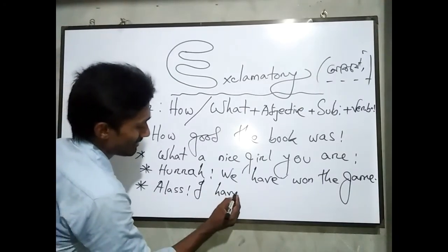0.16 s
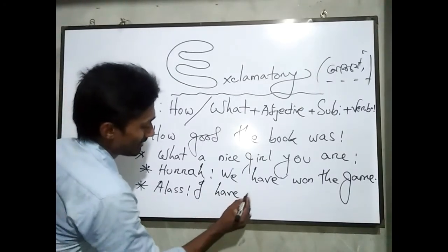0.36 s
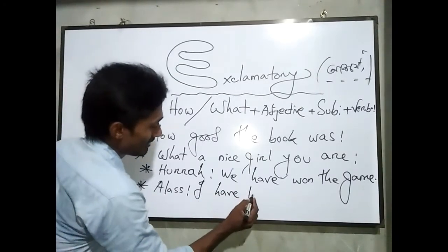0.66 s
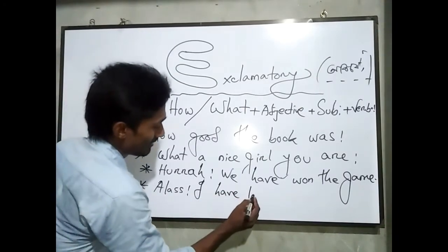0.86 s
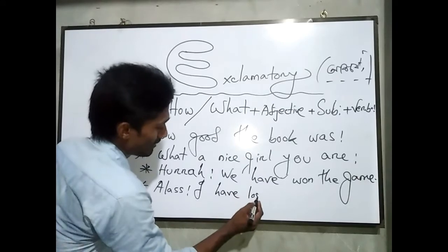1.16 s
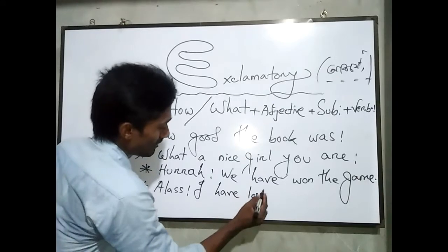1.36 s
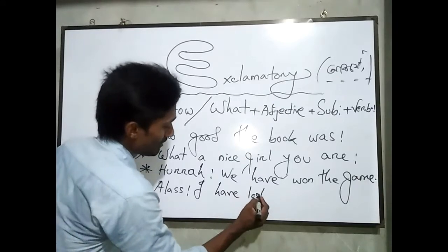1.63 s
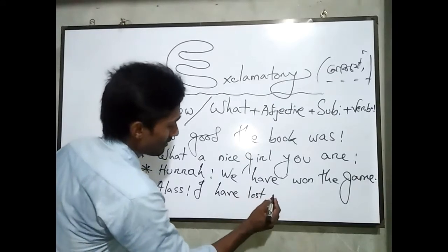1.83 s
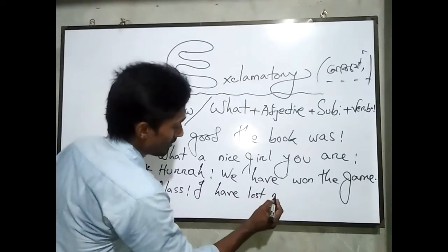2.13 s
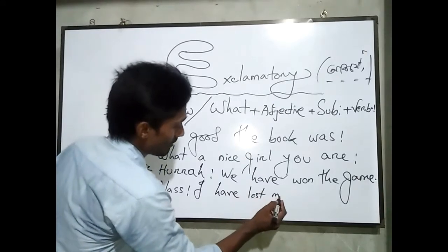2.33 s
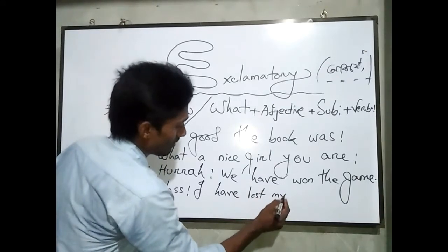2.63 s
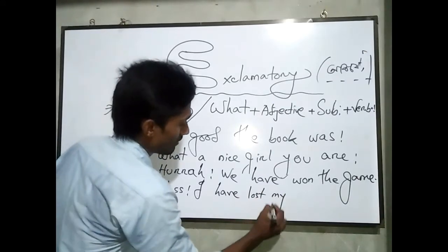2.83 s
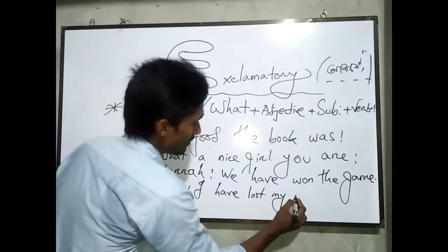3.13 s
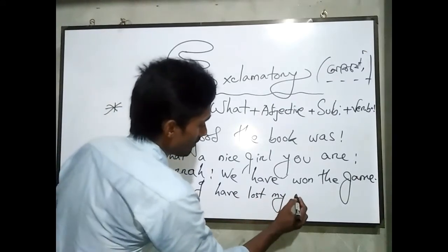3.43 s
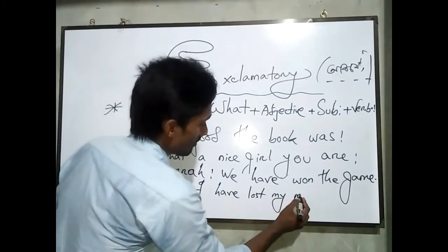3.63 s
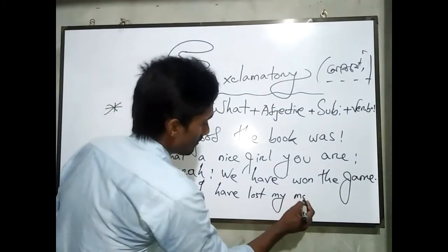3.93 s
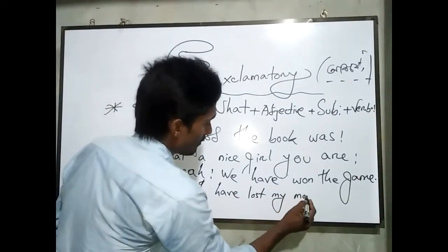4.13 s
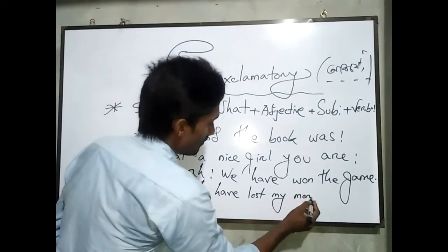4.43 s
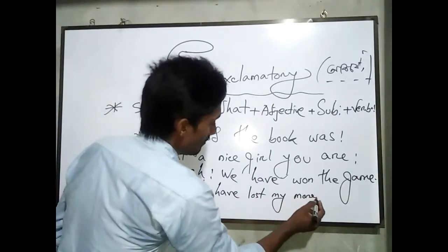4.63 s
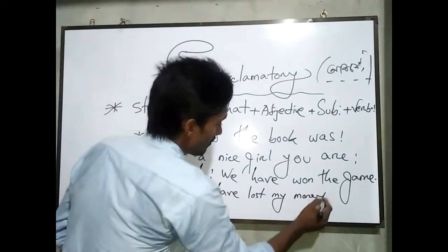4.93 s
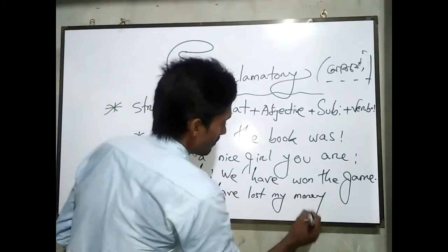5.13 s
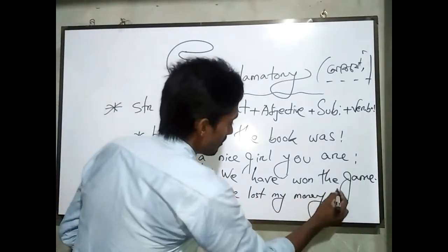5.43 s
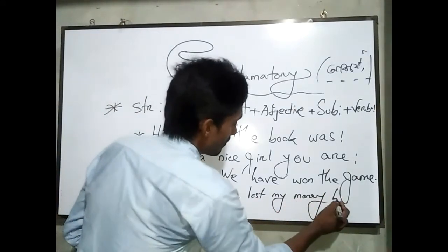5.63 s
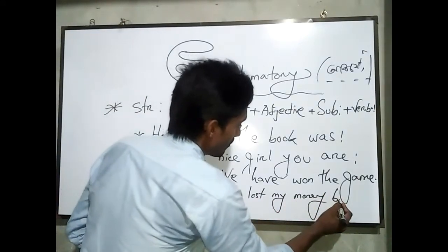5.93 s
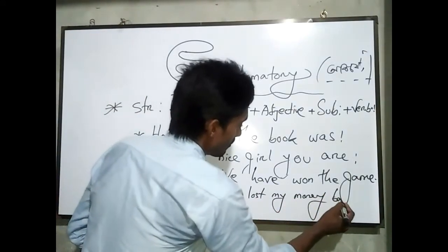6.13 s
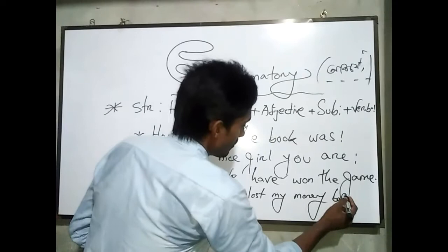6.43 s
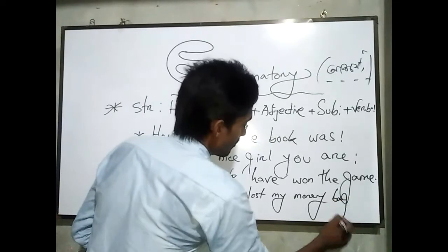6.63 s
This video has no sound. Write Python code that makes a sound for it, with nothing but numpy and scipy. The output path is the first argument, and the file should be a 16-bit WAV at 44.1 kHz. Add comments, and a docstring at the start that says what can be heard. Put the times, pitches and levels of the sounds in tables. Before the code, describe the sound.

Short hissing, rasping marker strokes and small taps cross a whiteboard in a small room with a steady low rumble.

```python
"""Low rumble, mains hum and faint hiss fill a small, hard room throughout.
From the first instant a felt marker writes a few words on a wall-hung whiteboard, in short strokes.
The nib lands, often with a tick or a knock on the board. It slides and hisses, rasps when pressed,
now and then chatters in a dull half-squeak, then lifts. The walls return a short tail."""
import sys
import numpy as np
from scipy import signal
from scipy.fft import rfft, irfft, next_fast_len
from scipy.io import wavfile
from scipy.ndimage import uniform_filter1d

SR = 44100
rng = np.random.default_rng(int(sys.argv[2]) if len(sys.argv) > 2 else 0)


def bounce(signal):
    """Save signal as a 16-bit WAV file at the path given by the first command-line argument."""
    frames = np.transpose(np.atleast_2d(signal))
    limited = np.clip(frames, -1, 1)
    pcm = np.round(limited * 32767).astype(np.int16)
    wavfile.write(sys.argv[1], SR, pcm)


N = 298599
T = np.arange(N) / SR

# room noise spectra: f/Hz, level/dB
RUMBLE_SPECTRUM = [(12, 4.5), (19, 17.5), (24, -2.5), (31, -3), (42, -9.5), (52, -0.5), (62, -7.5),
                   (68, -3.5), (80, -20.5), (125, -16.5), (180, -21.5), (245, -21), (335, -28),
                   (470, -36.5)]
AIR_SPECTRUM = [(260, -28.5), (480, 0.5), (900, -5.5), (1400, -7), (2400, -13.5), (3850, -16), (6000, -18),
                (6900, -16), (7250, -14), (7700, -17), (11400, -17.5), (14000, -20.5)]
# mains hum partials: f/Hz, level/dB
HUM_PARTIALS = [(51.5, -46.5), (100, -63.5), (198, -67.5)]
# knocks on the board: t/s, peak/dB, contact cut-off/Hz
KNOCK_EVENTS = [(0.516, -34.5, 465), (0.529, -33.5, 253), (1.174, -44, 1200), (1.475, -39, 160),
                (1.728, -36, 160), (1.907, -37, 700), (1.913, -27, 640), (1.923, -36.5, 500),
                (2.472, -42, 330), (2.491, -34, 120), (3.908, -38, 340), (5.247, -43, 700),
                (5.43, -48.5, 900)]
# panel modes: f/Hz, level/dB, t60/s
BOARD_MODES = [(121.7, 1.5, 0.16), (224, -16, 0.17), (333, 5, 0.073), (383, -3.5, 0.09), (424, -9.5, 0.21),
               (520.5, -4.5, 0.072), (582, -12.5, 0.062), (754, -30, .08)]
# ticks of nib and barrel: t/s, click peak/dB, clack peak/dB
TICK_EVENTS = [(.383, -46, -58.5), (.419, -45, -73), (1.355, -53.5, -76), (1.728, -67, -53.5),
               (2.475, -64, -65), (3.035, -48.5, -50.5), (3.495, -58, -73), (4.103, -65, -53.5),
               (4.396, -62, -51), (4.521, -55, -53.5), (4.817, -61, -52.5), (5.43, -57, -60),
               (5.518, -70, -49.5), (5.627, -54, -61), (5.683, -61, -50), (6.303, -65, -49.5)]
# bright click and hollow clack spectra: f/Hz, level/dB
CLICK_SPECTRUM = [(1500, -8), (3200, -0.5), (4600, -18), (6000, -4), (8000, 1.5), (11000, 0), (14000, 1)]
CLACK_SPECTRUM = [(400, -34.5), (900, 12), (1400, 9.5), (2200, 4), (3200, -9), (5000, -22), (10000, -48)]
# nib chatter: t/s, length/s, f/Hz, width/Hz, level/dB
CHATTER_EVENTS = [(0.384, 0.23, 1513, 280, -69.5), (0.646, 0.068, 1414, 170, -63),
                  (1.72, 0.25, 1485, 260, -62), (2.088, 0.034, 1436, 166, -68),
                  (2.208, 0.06, 1425, 150, -60.5), (2.385, 0.076, 1385, 160, -66.5),
                  (2.786, 0.1, 1377, 180, -62.5), (2.784, 0.16, 3190, 820, -64.5),
                  (2.792, 0.12, 5650, 2200, -69), (3.115, 0.02, 2000, 130, -68),
                  (3.296, 0.02, 1990, 130, -69), (3.51, 0.034, 1308, 180, -64.5),
                  (3.831, 0.064, 1320, 159, -62.5), (4.749, 0.11, 1096, 110, -67.5),
                  (4.89, 0.09, 2780, 400, -71), (5.265, 0.17, 1350, 230, -64.5),
                  (5.681, 0.049, 1364, 300, -68), (5.829, 0.096, 1228, 340, -64.5),
                  (6.62, 0.11, 1295, 169, -65)]
# sliding and pressing friction spectra: f/Hz, level/dB
HISS_SPECTRUM = [(2500, -29.5), (4500, -18.5), (6000, -11.5), (7500, -5), (9000, -1.5), (11500, 1.5),
                 (12700, -2), (14300, -14)]
RASP_SPECTRUM = [(400, -9.5), (750, 6.5), (1150, -3.5), (1450, -4.5), (1900, 6), (2450, -9), (3100, -1.5),
                 (4000, -12.5), (6000, -12.5), (10000, -35)]
# board and barrel resonances under the rubbing nib: f/Hz, width/Hz, level/dB
HOLLOW_MODES = [(1153, 260, -0.5), (1335, 154, 1), (1563, 180, -4.5), (2420, 540, -1.5), (2642, 240, -6),
                (2930, 115, -10)]
# pen strokes: t/s, length/s, hiss/dB, rasp/dB, start-to-end swell/dB
STROKE_EVENTS = [ (0.0, 0.059, -71, -67, -7), (0.137, 0.11, -70, -68.5, -3), (0.262, 0.15, -68, -73, -3),
                 (.425, .065, -66, -75, -7), (0.508, 0.022, -70, -66, 4), (0.548, 0.095, -68, -71.5, 3),
                 (0.788, 0.072, -73, -74, 0), (0.868, 0.086, -70.5, -70, 10),
                 (1.067, 0.049, -71, -66.5, -3), (1.143, .06, -72, -74, -1), (1.241, .03, -70.5, -70.5, 0),
                 (1.354, 0.1, -76, -79, -6), (1.499, 0.095, -68.5, -71.5, -7), (1.73, 0.056, -68.5, -73, 0),
                 (1.819, .04, -66, -70, -3), (1.931, .04, -69.5, -71, -2), (2.008, 0.079, -67.5, -69, 0),
                 (2.098, 0.063, -73, -75, 0), (2.214, 0.072, -68, -69.5, 1), (2.308, 0.054, -69.5, -71, -4),
                 (2.492, .045, -72, -70, 0), (2.553, 0.11, -70.5, -67.5, -1), (2.701, .13, -65, -72, 6),
                 (2.838, .145, -60.5, -69.5, 4), (3.1, .02, -73, -66.5, 0), (3.275, 0.023, -76, -70, 0),
                 (3.335, 0.073, -71, -71, -1), (3.428, 0.082, -67.5, -73, 1), (3.53, .055, -71, -73, -2),
                 (3.624, 0.15, -70, -70, 2), (3.923, 0.19, -73.5, -71, 12), (4.23, 0.048, -77, -71.5, 0),
                 (4.319, 0.17, -72, -67.5, -8), (4.505, 0.12, -68.5, -66, 0),
                 (4.642, 0.055, -67.5, -67.5, 0), (4.71, 0.076, -71, -68, 8), (4.825, 0.14, -64, -65, 6.5),
                 (4.992, 0.21, -68, -73.5, -8), (5.178, .105, -63, -68.5, 9), (5.285, 0.074, -65, -69, -3),
                 (5.414, 0.037, -75, -72, -6), (5.482, 0.031, -67.5, -67, 2),
                 (5.535, 0.11, -66.5, -69.5, 5), (5.68, 0.076, -65, -64.5, -7), (5.759, 0.14, -67, -74, 9),
                 (5.995, .055, -75, -74, 0), (6.07, 0.14, -70.5, -70, 2), (6.32, 0.12, -66.5, -72, 9),
                 (6.445, 0.11, -71, -72.5, 3), (6.548, .14, -66.5, -76, 4), (6.694, 0.075, -63.5, -72, 3)]


def undb(db):
    """Decibels to gain."""
    return 10 ** (np.asarray(db) / 20)


def unit(x):
    """Scale to rms 1."""
    return x / np.sqrt(np.mean(x ** 2))


def fade(t, t60_s):
    """Exponential decay, 60 dB down at t60_s."""
    return np.exp(-np.log(1000) * t / t60_s)


def add(track, start_s, sound):
    """Mix a sound into a track."""
    i = max(int(start_s * SR), 0)
    track[i:i + len(sound)] += sound[:N - i]


def walk(rate_hz):
    """Smooth random drift, rms 1."""
    step = max(int(SR / rate_hz), 1)
    held = np.repeat(rng.standard_normal(N // step + 2), step)
    return unit(uniform_filter1d(held, step)[:N])


def colour(x, points, skirt_db_per_oct=30):
    """Minimum-phase filter through (f/Hz, level/dB) points; skirts fall for two octaves."""
    size = 2 * next_fast_len(len(x))
    hz, db = np.transpose(points)
    octave = np.log2(np.maximum(np.fft.rfftfreq(size, 1 / SR), 1))
    knots = np.log2(hz)
    beyond_oct = np.abs(octave - np.clip(octave, knots[0], knots[-1]))
    gain_db = np.interp(octave, knots, db) - skirt_db_per_oct * np.minimum(beyond_oct, 2)
    cepstrum = irfft(np.log(undb(gain_db)))
    cepstrum[1:size // 2] *= 2
    cepstrum[size // 2 + 1:] = 0
    return irfft(rfft(x, size) * np.exp(rfft(cepstrum)))[:len(x)]


def resonate(x, hz, width_hz):
    """Two equal resonators in series, gain 1 at the centre."""
    b, a = signal.iirpeak(hz, hz / width_hz, fs=SR)
    return signal.lfilter(b, a, signal.lfilter(b, a, x))


def background(rumble_end_db=-34.5, air_db=-67.5, rise_db=2.0):
    """Rumble and wavering mains hum grow slowly under an even hiss."""
    rumble = unit(colour(rng.standard_normal(N), RUMBLE_SPECTRUM)) * undb(rumble_end_db)
    hum = np.zeros(N)
    for hz, db in HUM_PARTIALS:
        amplitude = np.sqrt(2) * undb(db + walk(5.6))
        hum += amplitude * np.sin(2 * np.pi * hz * T + 0.36 * walk(6))
    air = unit(colour(rng.standard_normal(N), AIR_SPECTRUM)) * undb(air_db)
    return (rumble + hum) * undb(rise_db * (T / T[-1] - 1)) + air


def walls(x, t60_s=0.31, wet_db=-9, delay_s=0.0037):
    """Bare walls add a short diffuse tail."""
    t = np.arange(SR // 2) / SR
    tail = rng.standard_normal(len(t)) * fade(t, t60_s) * (t > delay_s)
    return x + undb(wet_db) * signal.fftconvolve(x, tail / np.linalg.norm(tail))[:N]


def knocks(rattle_db=-12, rattle_t60_s=0.085, detune=0.033):
    """A landing rings the panel and shakes it in its frame; soft contact keeps only the low modes."""
    out, t = np.zeros(N), np.arange(SR // 3) / SR
    for start_s, peak_db, contact_hz in KNOCK_EVENTS:
        panel = np.zeros(len(t))
        for hz, mode_db, t60_s in BOARD_MODES:
            detuned_hz = hz * (1 + detune * rng.standard_normal())
            panel += undb(mode_db) * np.sin(2 * np.pi * detuned_hz * t) * fade(t, t60_s)
        noise = colour(rng.standard_normal(len(t)), [(180, -12.5), (700, -44.5), (1500, -25.0)])
        rattle = unit(noise) * fade(t, rattle_t60_s)
        blow = panel / np.abs(panel).max() + undb(rattle_db) * rattle
        blow = signal.sosfilt(signal.butter(2, contact_hz, fs=SR, output="sos"), blow)
        add(out, start_s, blow / np.abs(blow).max() * undb(peak_db))
    return out


def ticks(click_t60_s=0.065, clack_t60_s=0.07, ring_t60_s=0.16, ring_hz=6000, ring_db=-14, firm_db=-46):
    """The nib touches down with a click and a clack; firm clicks also ring the plastic barrel."""
    out, t = np.zeros(N), np.arange(SR // 5) / SR
    ring_spectrum = [(0.81 * ring_hz, -9), (ring_hz, 0), (1.12 * ring_hz, -7)]
    for start_s, click_db, clack_db in TICK_EVENTS:
        barrel_db = click_db + ring_db + 2 * min(click_db - firm_db, 0)
        for spectrum, t60_s, peak_db in ((CLICK_SPECTRUM, click_t60_s, click_db),
                                         (CLACK_SPECTRUM, clack_t60_s, clack_db),
                                         (ring_spectrum, ring_t60_s, barrel_db)):
            burst = colour(rng.standard_normal(len(t)) * fade(t, t60_s), spectrum)
            add(out, start_s, burst / np.abs(burst).max() * undb(peak_db))
    return out


def chatter(sag=0.051, skirt_ratio=4.2):
    """Stick-slip too uneven to sing: a rough band that swells, sags in pitch and fades."""
    out = np.zeros(N)
    for start_s, length_s, hz, width_hz, db in CHATTER_EVENTS:
        along = np.linspace(0, 1, int(length_s * SR))
        flutter = rng.standard_normal((2, SR // 2))
        for corner_hz in (width_hz / 2, skirt_ratio * width_hz / 2):
            flutter = signal.lfilter(*signal.butter(1, corner_hz, fs=SR), flutter)
        in_phase, quadrature = flutter[:, :len(along)]
        phase = 2 * np.pi * np.cumsum(hz * (1 + sag * (0.5 - along))) / SR
        band = unit(in_phase * np.cos(phase) + quadrature * np.sin(phase))
        swell = np.sqrt(np.abs(np.sin(np.pi * along)))
        add(out, start_s, band * swell * undb(db))
    return out


def slips(rate_hz, spread_db=2.0):
    """Felt fibres catch and let go: dense tiny clicks of uneven size."""
    clicks = (rng.random(N) < rate_hz / SR) * rng.standard_normal(N)
    return unit(clicks * undb(spread_db * rng.standard_normal(N)))


def shimmer(x, depth_db=2.5, rate_hz=24, bands=9):
    """The nib turns and shows new fibres, so each band of hiss swells on its own."""
    size = next_fast_len(N)
    spectrum, hz = rfft(x, size), np.fft.rfftfreq(size, 1 / SR)
    centres_hz = np.linspace(HISS_SPECTRUM[1][0], HISS_SPECTRUM[-1][0], bands)
    out = np.zeros(N)
    for weights in np.eye(bands):
        band = irfft(spectrum * np.interp(hz, centres_hz, weights), size)[:N]
        out += band * undb(depth_db * walk(rate_hz))
    return unit(out)


def hollow(x, direct_db=-7, drift_db=2, drift_hz=8.1):
    """Board and barrel pass their resonances on to the air."""
    resonances = sum(undb(db + drift_db * walk(drift_hz)) * resonate(x, hz, width_hz)
                     for hz, width_hz, db in HOLLOW_MODES)
    return unit(undb(direct_db) * x + resonances)


def contact(length_s, swell_db, land_s=0.016, lift_t60_s=0.098, arch_db=1):
    """Stroke envelope: the nib lands, runs fastest mid-line while it swells or fades, and lifts."""
    t = np.arange(int((length_s + lift_t60_s) * SR)) / SR
    along = np.minimum(t / length_s, 1)
    level_db = swell_db * (along - 0.5) + arch_db * (np.sin(np.pi * along) - 2 / np.pi)
    landing = np.minimum(t / land_s, 1)
    lift = fade(np.maximum(t - length_s, 0), lift_t60_s)
    return landing * undb(level_db) * lift


def strokes(flicker_db=0.73, bunch_db=1.6):
    """Fine slips hiss at the sliding nib; under pressure, coarser bunches rasp through pen and board."""
    slide, press = np.zeros(N), np.zeros(N)
    for start_s, length_s, hiss_db, rasp_db, swell_db in STROKE_EVENTS:
        envelope = contact(length_s, swell_db)
        add(slide, start_s, envelope * undb(hiss_db))
        add(press, start_s, envelope * undb(rasp_db))
    hiss = shimmer(colour(slips(rate_hz=16000), HISS_SPECTRUM))
    hiss *= undb(flicker_db * walk(50))
    bunches = undb(bunch_db * walk(55))
    rasp = hollow(colour(slips(rate_hz=8000), RASP_SPECTRUM)) * bunches
    return hiss * slide + rasp * press


def scene():
    """Pen and board in the room, over its background; mono."""
    marker = strokes() + chatter() + knocks() + ticks()
    return (walls(marker) + background())[None]


def record(dry, cutoff_hz=14300):
    """Steep low-pass on the top treble."""
    return signal.sosfilt(signal.ellip(10, 0.2, 70, cutoff_hz, fs=SR, output="sos"), dry)


dry = scene()
out = record(dry)
bounce(out)
```